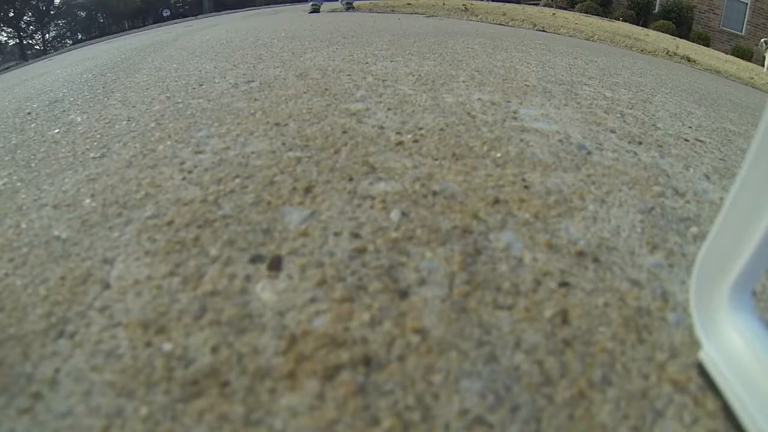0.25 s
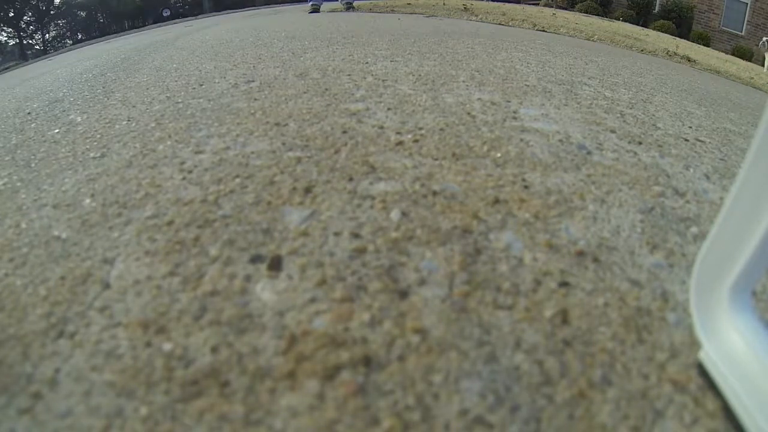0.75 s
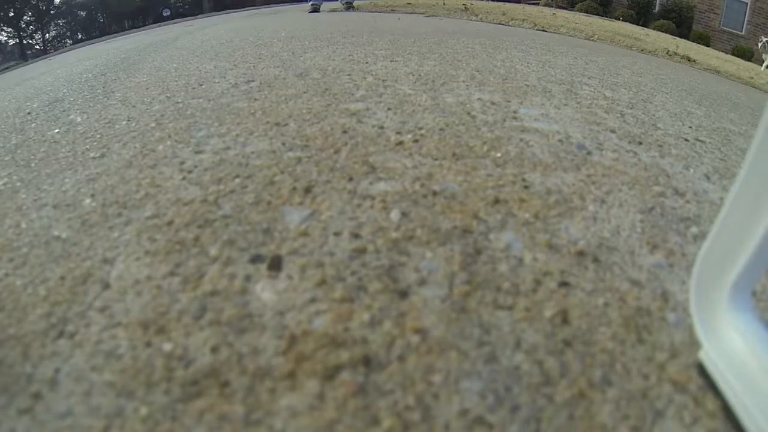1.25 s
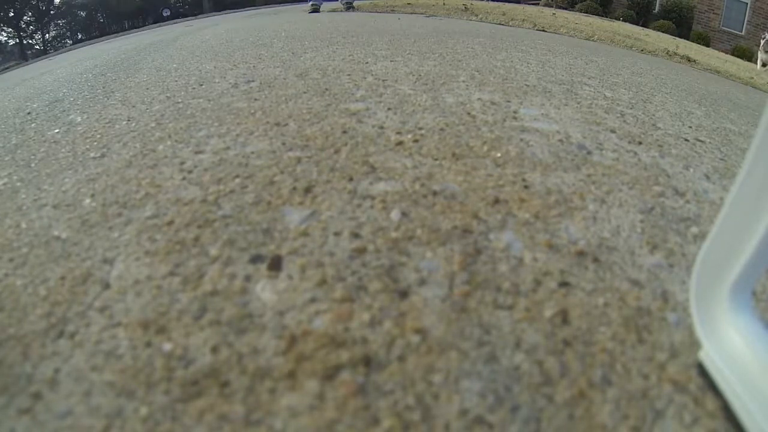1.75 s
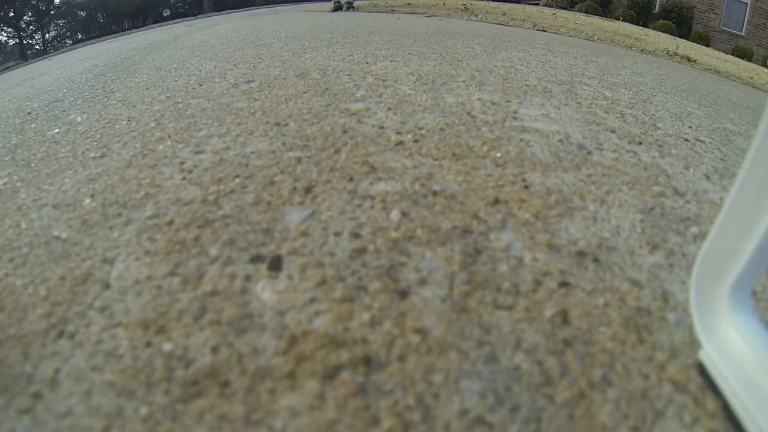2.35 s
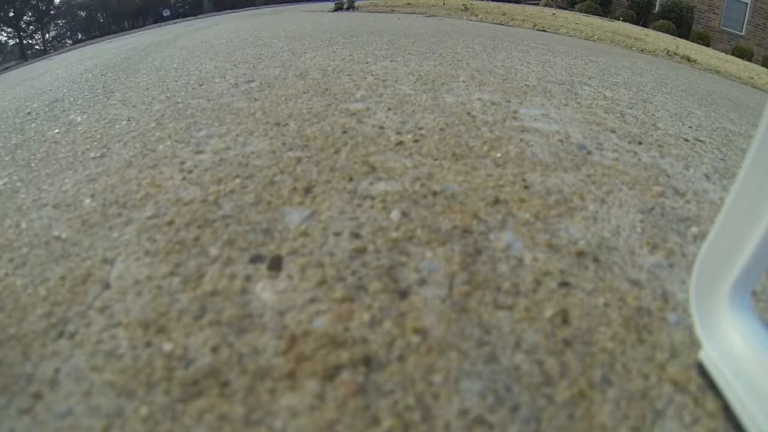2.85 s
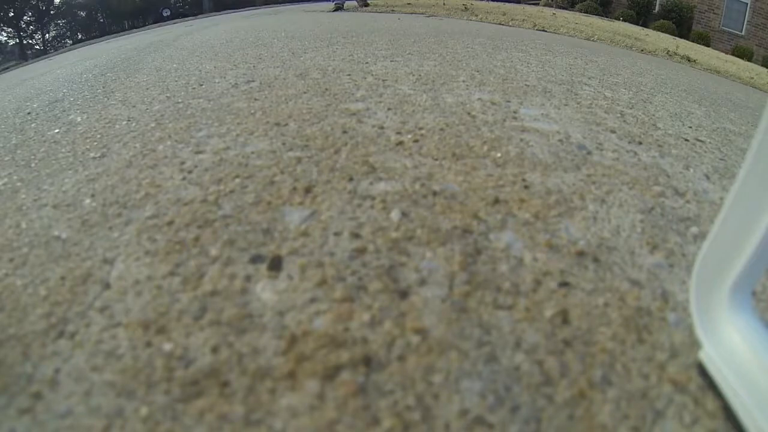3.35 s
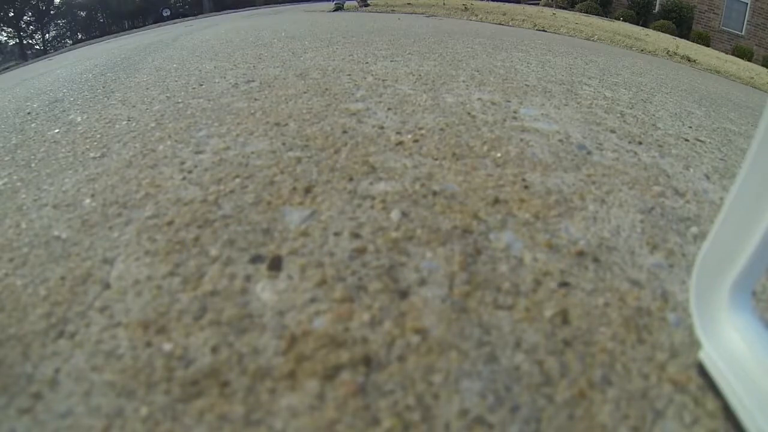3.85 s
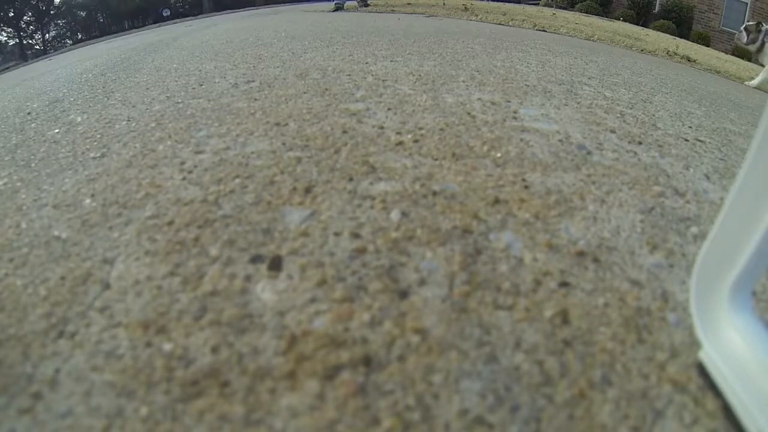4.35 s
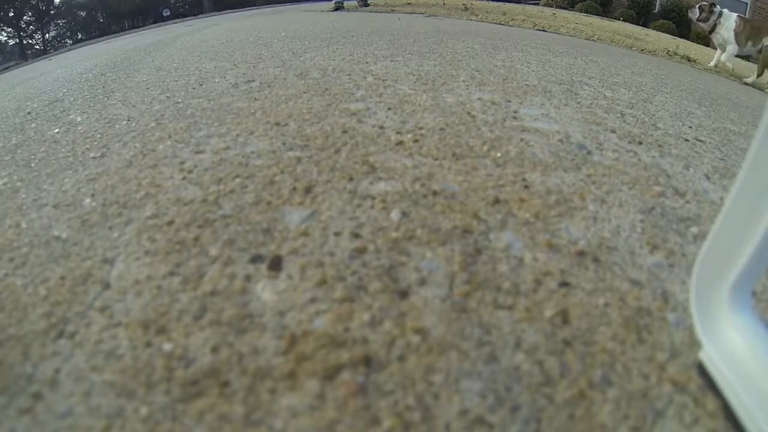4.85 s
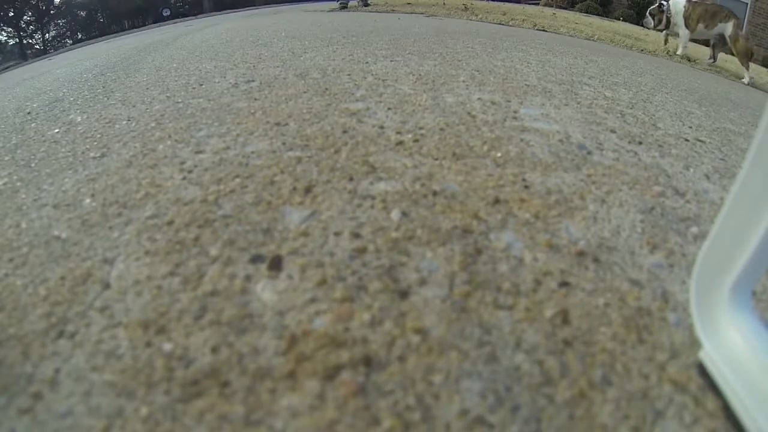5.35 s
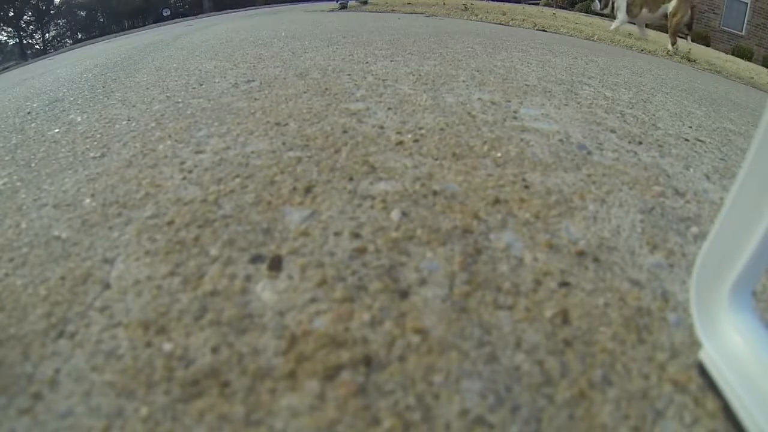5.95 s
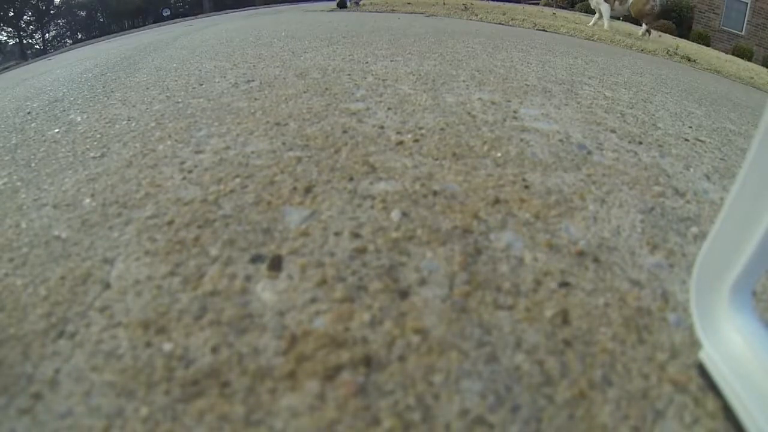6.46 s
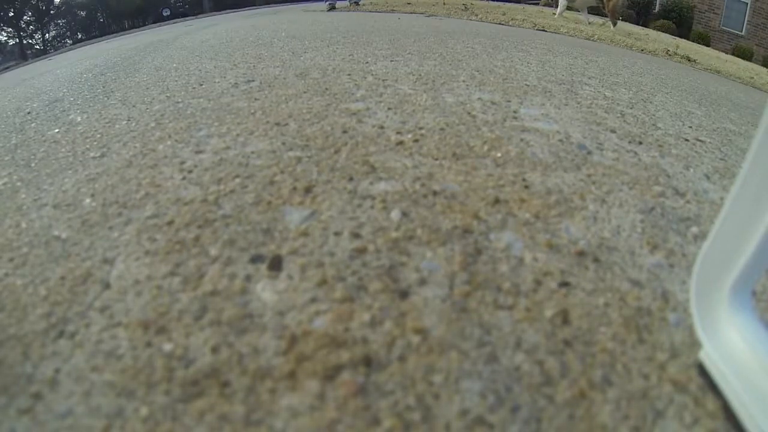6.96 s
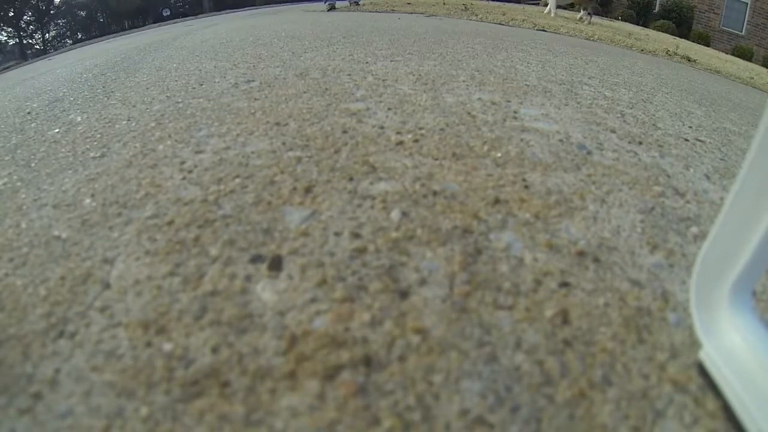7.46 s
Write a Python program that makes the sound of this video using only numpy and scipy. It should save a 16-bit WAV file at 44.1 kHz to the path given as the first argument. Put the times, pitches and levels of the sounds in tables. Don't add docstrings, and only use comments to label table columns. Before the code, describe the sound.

Wind thumps the microphone before small propeller motors judder to life and settle into a steady, beating electric whine with a thin high whistle.

```python
import sys
import numpy as np
from scipy import signal
from scipy.fft import rfft, irfft, next_fast_len
from scipy.io import wavfile
from scipy.ndimage import uniform_filter1d

SR = 44100
rng = np.random.default_rng(int(sys.argv[2]) if len(sys.argv) > 2 else 0)


def to_wav(sig):
    pcm = np.clip(np.atleast_2d(sig), -1, 1) * 32767
    pcm = np.round(pcm).astype(np.int16)
    wavfile.write(sys.argv[1], SR, pcm.T)


def to_linear_factor(level_db):
    exponent = np.asarray(level_db, float) / 20
    return 10 ** exponent


N = 339570
START_S, SYNC_S = 0.768, 1.08
FRAME_RATE_HZ = 59.94


def rms_one(x):
    return x / np.sqrt(np.mean(x ** 2) + 1e-20)


def in_time(rows):
    s, *columns = np.transpose(rows)
    return [np.interp(np.arange(N) / SR, s, c) for c in columns]


def at_hz(points, hz):
    point_hz, level_db = np.array(points).T
    return np.interp(np.log(hz), np.log(point_hz), level_db)


def drift(rate_hz):
    r = np.exp(-80 * np.pi * rate_hz / SR)
    slow = signal.lfilter([1], [1, -2 * r, r * r], rng.standard_normal(N // 40 + 2002))[2000:]
    return np.interp(np.arange(N) / 40, np.arange(len(slow)), rms_one(slow))


def colour(x, gain_at):
    size = next_fast_len(N)
    hz = np.maximum(np.arange(size // 2 + 1) * SR / size, 1)
    return irfft(rfft(x, size) * gain_at(hz), size)[:N]


def band(x, low_hz, high_hz):
    return signal.sosfilt(signal.butter(2, [low_hz, high_hz], "band", fs=SR, output="sos"), x)


def gusting():
    # (time [s], peak level [dB], dying time [s])
    gusts = [(0.005, -23, .04), (.2, -28, 0.12), (.39, -29, 0.19), (.52, -19.5, 0.067), (.85, -20, .04),
             (1.21, -26, .05), (1.43, -34.5, 0.098), (1.69, -35.5, 0.065), (2.08, -21.5, 0.04),
             (2.26, -38, 0.012), (2.41, -24, 0.033), (2.72, -28, 0.043), (3.14, -24, 0.063),
             (3.62, -29.5, 0.08), (3.75, -28.5, 0.079), (4.17, -27, 0.078), (4.5, -29, 0.051),
             (4.8, -30, 0.026), (5.62, -36, 0.029), (5.83, -32, 0.032), (6.05, -28.5, 0.082),
             (6.57, -18.5, .04), (6.76, -27.5, 0.085)]
    calm_db, rise_share = -43.5, 0.56
    t = np.arange(N) / SR
    gain = np.full(N, to_linear_factor(calm_db))
    for s, db, dying_s in gusts:
        gain += to_linear_factor(db) * np.exp(-np.maximum((s - t) / rise_share, t - s) / dying_s)
    return gain


def wind():
    # (frequency [Hz], density [dB per Hz])
    spectrum = [(8.8, -25), (15, -6.5), (38, 0), (83, -9), (183, -21.5), (249, -25.5), (309, -31),
                (600, -39), (780, -73.5), (1320, -120)]
    noise = colour(rng.standard_normal(N), lambda hz: to_linear_factor(at_hz(spectrum, hz)))
    return gusting() * to_linear_factor(1.5 + 3.24 * drift(3.3)) * noise / np.std(band(noise, 45.3, 75))


def street():
    # (frequency [Hz], density [dB per Hz])
    traffic = [(290, -32), (500, -7), (589, -14.5), (721, -2.5), (972, -1), (1300, -11), (1950, -11),
               (2780, -26.5), (5000, -40.5), (6500, -67.5), (11000, -120)]
    # (frequency [Hz], level [dB])
    standby = [(5690., -69), (11390., -69)]
    street_db, hiss_db = -41.5, -67.5
    t = np.arange(N) / SR
    out = to_linear_factor(street_db) * rms_one(colour(rng.standard_normal(N), lambda hz: to_linear_factor(at_hz(traffic, hz))))
    out += to_linear_factor(hiss_db) * band(rng.standard_normal(N), 5000, 14000)
    pulse = (0.5 + 0.5 * np.cos(2 * np.pi * (FRAME_RATE_HZ * t - 0.3))) ** 2
    for hz, db in standby:
        phase = hz * t + np.cumsum(hz * 0.0011 * drift(7.4)) / SR
        out += to_linear_factor(db + 4 + 2 * drift(20)) * pulse * np.sin(2 * np.pi * phase)
    return out


def turning():
    # (time [s], frequency [Hz])
    hunt_1 = [(2.0, 1813), (2.22, 1802), (2.5, 1815), (2.75, 1808), (3.0, 1815), (3.6, 1807), (3.8, 1815),
              (4.25, 1817), (4.66, 1876), (4.9, 1860), (5.2, 1819), (5.92, 1796), (6.3, 1806), (6.5, 1805),
              (6.68, 1814), (7.1, 1793), (7.6, 1811)]
    hunt_2 = [(1.7, 1733), (1.8, 1740), (2.12, 1723), (2.5, 1748), (2.9, 1734), (3.19, 1761), (3.6, 1720),
              (3.8, 1726), (4.3, 1717), (4.5, 1750), (4.9, 1717), (5.7, 1759), (5.95, 1746), (6.1, 1752),
              (6.6, 1753), (7.08, 1710), (7.3, 1715), (7.52, 1732)]
    hunt_3 = [(1.6, 1707), (2.0, 1698), (2.25, 1707), (2.85, 1696), (3.3, 1703), (3.9, 1701), (4.36, 1710),
              (5.1, 1694), (5.95, 1698), (6.7, 1690), (7.1, 1693), (7.7, 1714)]
    hunt_4 = [(1.75, 1654), (2.0, 1631), (2.43, 1661), (2.7, 1645), (3.2, 1658), (3.52, 1640), (3.8, 1656),
              (4.0, 1658), (4.3, 1670), (4.75, 1645), (5.0, 1651), (5.3, 1650), (5.88, 1664), (6.3, 1656),
              (6.5, 1660), (7.1, 1650), (7.48, 1678), (7.7, 1670)]
    # (excess cogging [Hz], settling time [s])
    overshoot = [(127, .105), (205, .13), (145, .105), (178, .135)]
    wobbles = (1.2, .8, 2, 2.5)
    inertia_s = 0.08
    t = np.arange(N) / SR
    ramp = np.clip((t - START_S) / (SYNC_S - START_S), 0, 1)
    since_s = np.maximum(t - SYNC_S, 0)
    cogging_hz = []
    for hunt, wobble_hz, (excess_hz, settle_s) in zip((hunt_1, hunt_2, hunt_3, hunt_4), wobbles, overshoot):
        idle_hz = uniform_filter1d(in_time(hunt)[0], round(inertia_s * SR)) + wobble_hz * drift(14.9)
        excess = excess_hz * (1 + since_s / settle_s) * np.exp(-since_s / settle_s)
        cogging_hz.append(idle_hz + excess)
    return ramp * np.array(cogging_hz) / 84


def frame_gain(hz):
    # (centre [Hz], width [Hz], level [dB])
    modes = [(423, 190, -12), (611, 160, -16), (690, 210, -17.5), (786.5, 57, -1.5), (898, 370, -8.5),
             (1108, 84, -8), (1300, 92, -23), (1430, 30, -9.5), (1690, 250, -9), (1745, 160, -6.5),
             (2106, 295, -7.5), (2572, 284, -7.5), (2987, 440, -9.5), (3800, 450, -22.5), (4555, 131, -16),
             (5020, 690, -27.5), (8140, 640, -29.5), (8900, 1300, -38)]
    # (frequency [Hz], level [dB])
    bed = [(100, -8.5), (300, -12), (1300, -26.5), (3500, -24), (6500, -52.5), (10000, -48), (13000, -58),
           (16000, -79.5)]
    power = to_linear_factor(at_hz(bed, np.maximum(hz, 1))) ** 2
    for centre_hz, width_hz, db in modes:
        power = power + to_linear_factor(db) ** 2 / (1 + (2 * (hz - centre_hz) / width_hz) ** 2) ** 2
    return np.sqrt(power)


def kick(turns, starting):
    # (time [s], low shake level [dB], high shake level [dB])
    levels = [
        (0.768, -8, -1),
        (0.782, -20, -37.5),
        (0.798, -14.5, -13),
        (0.876, -17.5, -14.5),
        (0.926, -15.5, -13),
        (0.956, -14.5, -13.5),
        (1.014, -14, -13),
        (1.06, -21, -19.5),
    ]
    # (frequency [Hz], density [dB per Hz])
    grind = [(180, -67), (300, -55), (440, -12.5), (532, -19), (780, 2), (1030, -13), (1750, -11.5),
             (2570, -11.5), (3880, -19), (4230, -30), (5120, -24), (6110, -43), (7290, -47), (8200, -30),
             (10100, -47), (13100, -91), (22000, -120)]
    hiss_db, jolt_db = -49, -32
    ring_hz, ring_db = 771, -2
    steps = sum(np.diff(np.floor(42 * turn + rng.random()), prepend=0) for turn in turns)
    force = steps * 2.5 * rng.normal(0.66, 1, N) + rng.standard_normal(N)
    shaken = colour(force * starting, lambda hz: to_linear_factor(at_hz(grind, hz)) * frame_gain(hz) ** 0.5)
    low_db, high_db = in_time(levels)
    span = starting > 0.5
    low, high = band(shaken, 310, 945), band(shaken, 1200, 13000)
    ring = band(force * starting, ring_hz - 14, ring_hz + 14)
    low = low / np.std(band(low, 650, 748)[span]) + to_linear_factor(ring_db) * ring / np.std(ring[span])
    sizzle = band(band(rng.standard_normal(N), 5500, 10000), 6000, 10000)
    low = to_linear_factor(low_db - 4) * low + to_linear_factor(hiss_db) * rms_one(sizzle)
    after_s = np.maximum(np.arange(N) / SR - START_S, 0)
    jolt = to_linear_factor(jolt_db) * np.exp(-after_s / 0.003) * rms_one(band(rng.standard_normal(N), 1200, 4000))
    return starting * (low + jolt + to_linear_factor(high_db) * high / np.std(high[span]))


def arm_ring():
    ring_hz, ring_db, fade_s = 444.4, -34, 0.28
    t = np.arange(N) / SR
    fade = np.exp(-(np.maximum(t - SYNC_S, 0) / fade_s) ** 2)
    ring = band(rng.standard_normal(N) * (t > START_S) * fade, ring_hz - 12, ring_hz + 12)
    return to_linear_factor(ring_db) * ring / np.std(ring[(t > START_S) & (t < SYNC_S)])


def whistle(turns, starting, load_db):
    # (motor index, carrier level [dB], upper side [dB], lower side [dB], loss per pair [dB])
    switching = [(0, -46, -24, -17, 14), (1, -48, -26, -26, 14), (2, -39.5, -12, -30, 16),
                 (3, -38, -12, -15, 7.5)]
    carriers_hz = (8026.5, 8014, 8078.3, 8060.3)
    mixing_hz, mixing_db = 14870, -72
    t = np.arange(N) / SR
    mixing_phase = mixing_hz * t + np.cumsum(40 * drift(30)) / SR
    out = to_linear_factor(mixing_db + 3 * drift(10)) * np.sin(2 * np.pi * mixing_phase)
    for motor, db, upper_db, lower_db, loss_db in switching:
        carrier = carriers_hz[motor] * t + np.cumsum(drift(5.1)) / SR
        out += to_linear_factor(db + 2.5 + drift(3.5)) * np.sin(2 * np.pi * carrier)
        for pair in range(1, 6):
            for sign, side_db in ((1, upper_db), (-1, lower_db)):
                fall_db = side_db - loss_db * (pair - 1) * (1.75 - 0.75 * sign)
                gain_db = db + 3 + fall_db * (1 - 0.4 * starting) + (1 - starting) * load_db
                phase = carrier + sign * pair * 14 * turns[motor] + rng.random()
                out += to_linear_factor(gain_db + 2 * drift(12)) * np.sin(2 * np.pi * phase)
    return out


def shake(turns, shake_db):
    runout_db, pole_buzz = -10, 0.13
    throb = 1 + 0.011 * sum(np.sin(4 * np.pi * turn) for turn in turns)
    runout = np.zeros(N)
    for turn in turns:
        pattern = np.interp(turn % 1, np.linspace(0, 1, 400), rng.standard_normal(400))
        runout += pattern * to_linear_factor(2 * drift(6))
    force = rng.standard_normal(N) + to_linear_factor(runout_db) * rms_one(runout) * 0.33
    buzz = 1 + pole_buzz * sum(np.cos(14 * np.pi * turn) for turn in turns)
    noise = colour(force * buzz, frame_gain)
    return to_linear_factor(shake_db + drift(3.7)) * throb * noise / np.std(band(noise, 1620, 4100))


def tones(speed, turns, locking):
    lower_orders = { 15: (-49, -64, -61, -59), 16: (-53, -49, -51, -64), 21: (-46, -62, -56, -62),
                    26: (-44, -65, -66, -59), 28: (-37, -62, -56, -46), 30: (-47, -59, -52, -63),
                    35: (-42, -41, -46, -48), 36: (-32, -29, -38, -44), 37: (-42, -37, -42, -41),
                    39: (-45, -41, -53, -48), 42: (-57, -42, -37, -49), 45: (-49, -53, -42, -50),
                    46: (-36, -51, -44, -46), 47: (-42, -50, -36, -39), 48: (-42, -50, -47, -44),
                    49: (-30, -40, -33, -33), 51: (-40, -39, -45, -51), 53: (-55, -41, -51, -44),
                    55: (-64, -56, -60, -38), 56: (-44, -53, -54, -54), 61: (-57, -45, -59, -48),
                    63: (-63, -53, -54, -48)}
    upper_orders = { 70: (-35, -55, -56, -70), 72: (-65, -44, -58, -62), 84: (-31, -18, -30, -26),
                    77: (-60, -42, -60, -55), 88: (-69, -48, -58, -58), 91: (-46, -56, -59, -52),
                    98: (-46, -50, -63, -49), 105: (-41, -50, -48, -44), 112: (-50, -62, -46, -66),
                    119: (-40, -47, -60, -51), 126: (-38, -44, -47, -46), 133: (-48, -55, -61, -52),
                    140: (-50, -62, -56, -51), 147: (-44, -52, -47, -54), 168: (-57, -62, -49, -54),
                    182: (-71, -75, -74, -54), 210: (-63, -80, -73, -75)}
    surge_db = (2, 3, 15, 6)
    out, coarse = np.zeros(N), np.arange(0, N, 64)
    for m in range(4):
        idle = np.median(speed[m])
        surge_speed = np.where(locking < 1, speed[m].max(), speed[m])[coarse]
        over = 10 * (surge_speed / idle - 1) * (coarse < 2 * SR)
        wavers = [drift(1.4) + 0.12 * drift(17) for _ in range(3)]
        for k, (order, levels_db) in enumerate({**lower_orders, **upper_orders}.items()):
            swell = frame_gain(order * speed[m, coarse]) / frame_gain(order * idle)
            ripple_db = surge_db[m] * over * (order % 12 == 0 and order < 100)
            gain = to_linear_factor(levels_db[m] + 3 + ripple_db + 1.2 * wavers[k % 3][coarse])
            gain = gain * swell * locking[coarse] ** ((order / 30) ** 2)
            phase = order * turns[m] + rng.random() * (order % 7 > 0)
            out += np.interp(np.arange(N), coarse, gain) * np.sin(2 * np.pi * phase)
    return out


def in_step():
    # (time [s], peak level [dB], half length [s])
    swells = [(1.303, -30.5, .25), (2.063, -16.5, 0.13), (2.507, -35.5, .12), (3.112, -15, 0.086),
              (3.703, -30, 0.13), (4.21, -26.5, .12), (4.693, -19.5, 0.18), (4.93, -17.5, 0.072),
              (5.304, -20.5, 0.17), (5.953, -15.5, 0.093), (6.29, -18.5, 0.087), (6.56, -22, 0.084),
              (6.83, -19, 0.15), (7.067, -26.5, 0.046), (7.4, -25, 0.088)]
    out_of_step_db = -27
    t = np.arange(N) / SR
    return to_linear_factor(out_of_step_db) + sum(to_linear_factor(db) * np.exp(-((t - s) / half_s) ** 2) for s, db, half_s in swells)


def blades(turns, locking):
    # (multiple, level [dB])
    overtones = [(1, 0), (2, -9.5), (3, -12), (4, -18)]
    out = in_step() * to_linear_factor(0.5) * np.sin(4 * np.pi * turns[1:3].mean(axis=0))
    for multiple, db in overtones[1:]:
        for turn in turns:
            phase = 2 * multiple * turn + rng.random()
            out += to_linear_factor(db - 27.5 + 2 * drift(3.9)) * np.sin(2 * np.pi * phase)
    return locking * out


def yelps():
    # (time [s], length [s], start [Hz], end [Hz], level [dB])
    calls = [
        (2.645, 0.043, 448, 440, -30),
        (7.385, 0.083, 486, 580, -34.5),
        (7.39, 0.056, 329, 360, -34.5),
    ]
    out = np.zeros(N)
    for s, length_s, start_hz, end_hz, db in calls:
        count, at = round(length_s * SR), round(s * SR)
        phase = np.cumsum(np.linspace(start_hz, end_hz, count)) / SR
        out[at:at + count] += to_linear_factor(db + 8.5) * np.hanning(count) * np.sin(2 * np.pi * phase)
    return out


def scene():
    # (time [s], shake level [dB], tone gain [dB])
    load = [(1.1, -30, -4), (1.43, -30.5, 0), (1.8, -27, 0), (2.96, -26.5, 2.5), (3.09, -26, 1),
            (4.57, -26, 2.5), (4.92, -27.5, 1), (6.3, -25.5, 2), (6.74, -27, 0), (7.27, -26, 2),
            (7.7, -24.5, 2)]
    t = np.arange(N) / SR
    speed = turning()
    turns = np.cumsum(speed, axis=1) / SR
    running = np.clip((t - START_S) / 0.001, 0, 1)
    starting = running * np.clip((SYNC_S + 0.003 - t) / 0.0095, 0, 1)
    locking = np.clip((t - START_S) / (SYNC_S - START_S), 0, 1)
    shake_db, tone_db = in_time(load)
    surroundings = wind() + street() + yelps()
    start = kick(turns, starting) + arm_ring()
    motors = running * (whistle(turns, starting, tone_db - 1.5) + shake(turns, shake_db))
    motors += to_linear_factor(tone_db) * tones(speed, turns, locking) + blades(turns, locking)
    return (surroundings + start + motors)[None]


def roll_off(x):
    return signal.sosfilt(signal.butter(12, 15650, fs=SR, output="sos"), x)


def record(dry):
    slip_start_frames, slip_s = 1.88, 1 / 48000
    x = 1.146 * np.tanh(dry[0] / 1.234)
    late = colour(x, lambda hz: np.exp(-2j * np.pi * hz * slip_s))
    frame = np.floor(np.arange(N) / SR * FRAME_RATE_HZ - slip_start_frames)
    x = np.where(frame % 5 == 0, late, x)
    x = signal.sosfilt(signal.butter(2, 13000, fs=SR, output="sos"), x)
    return roll_off(x[None])


dry = scene()
out = record(dry)
to_wav(out)
```